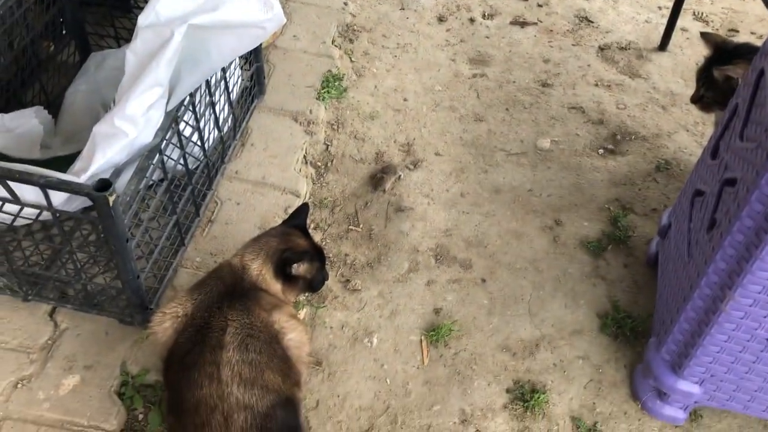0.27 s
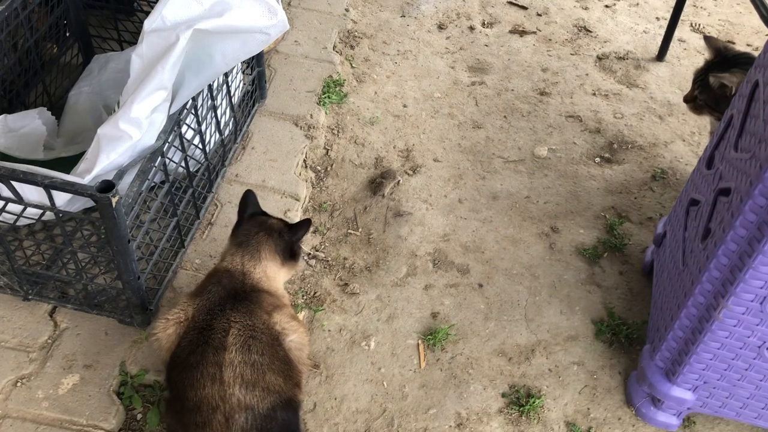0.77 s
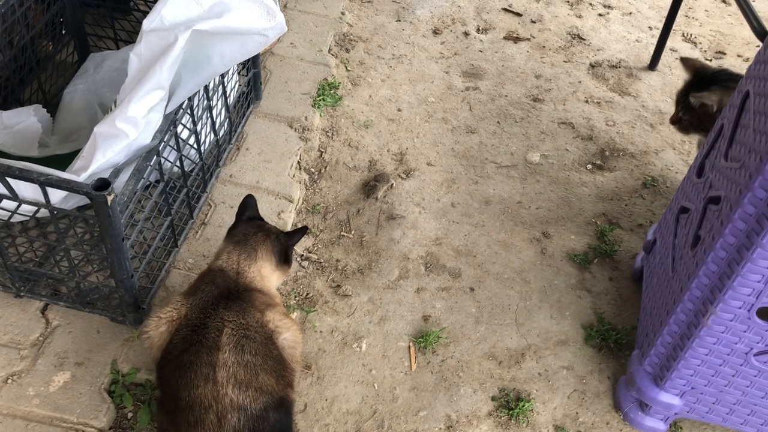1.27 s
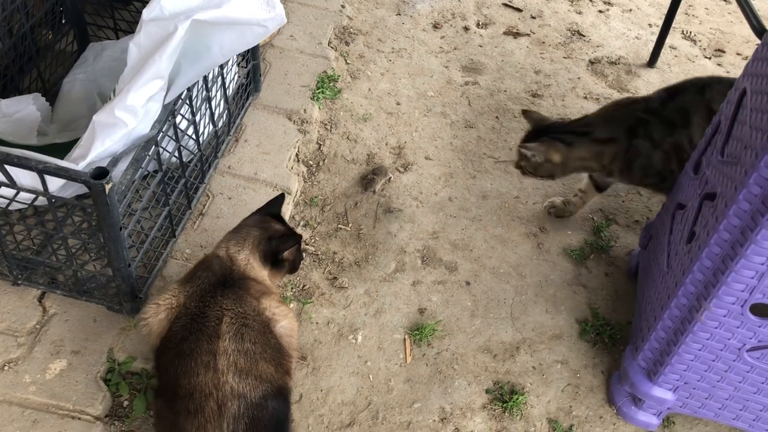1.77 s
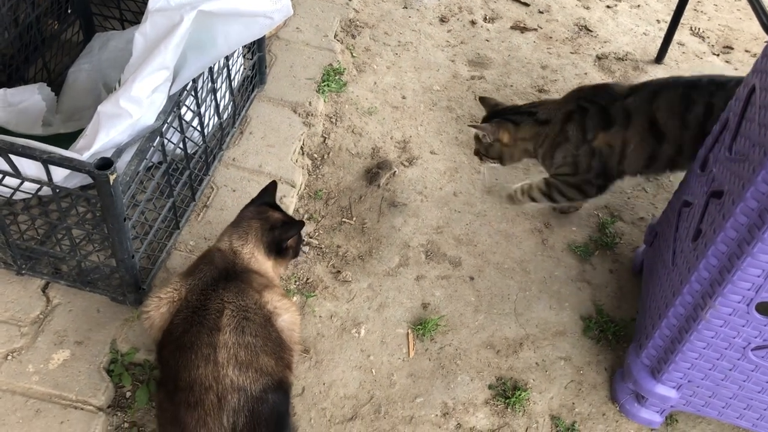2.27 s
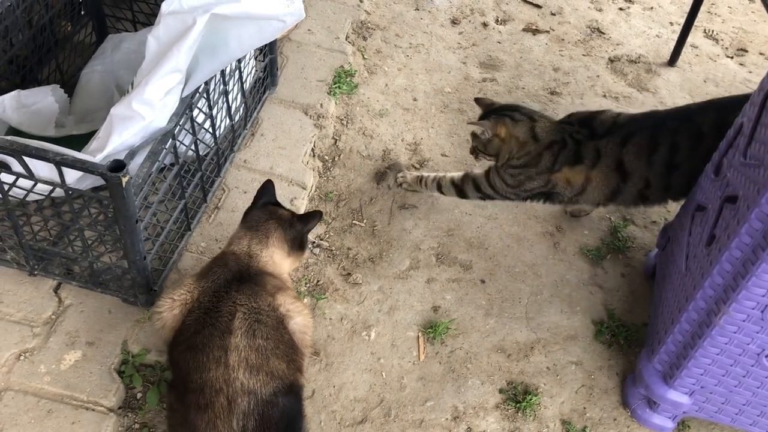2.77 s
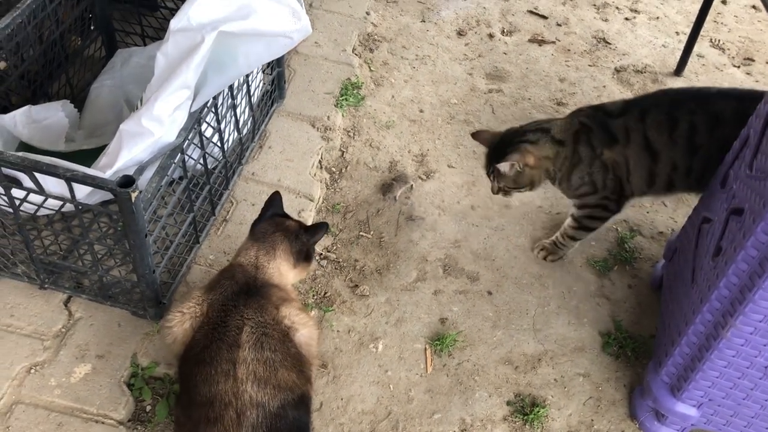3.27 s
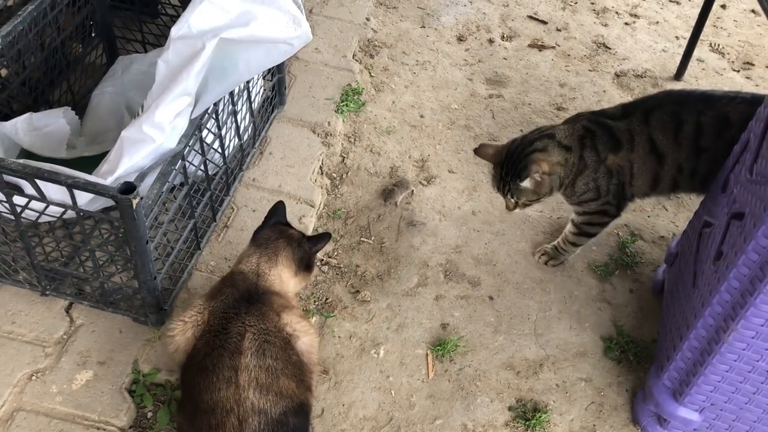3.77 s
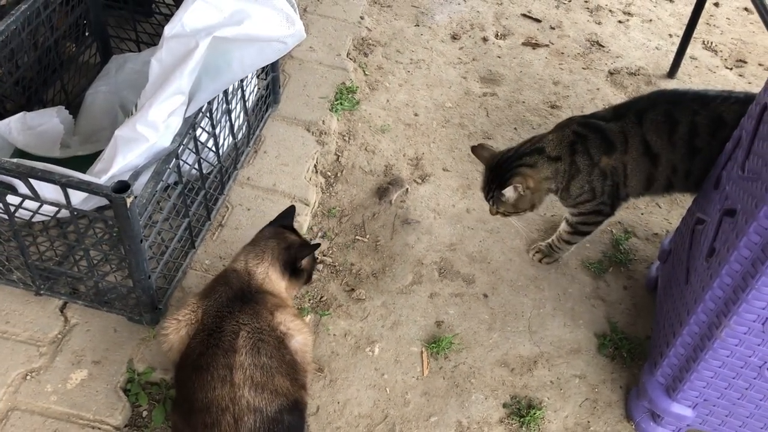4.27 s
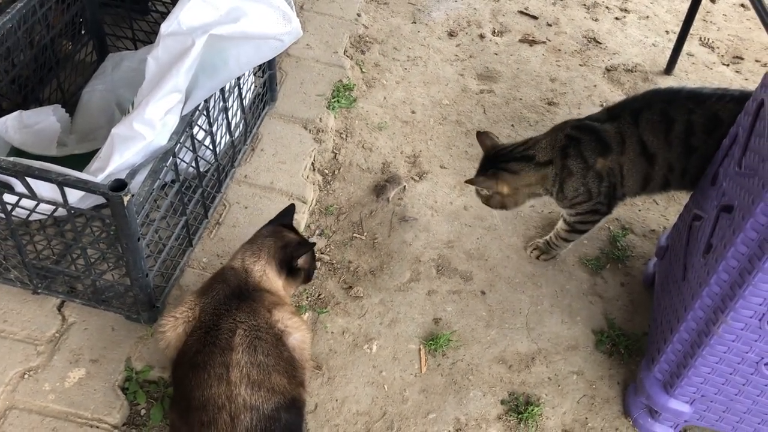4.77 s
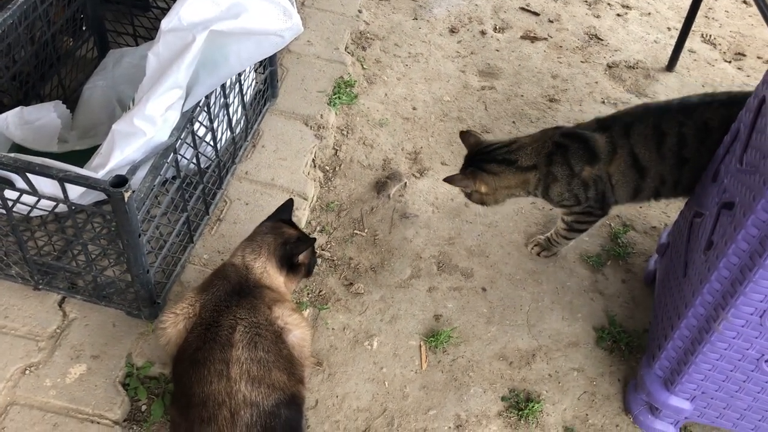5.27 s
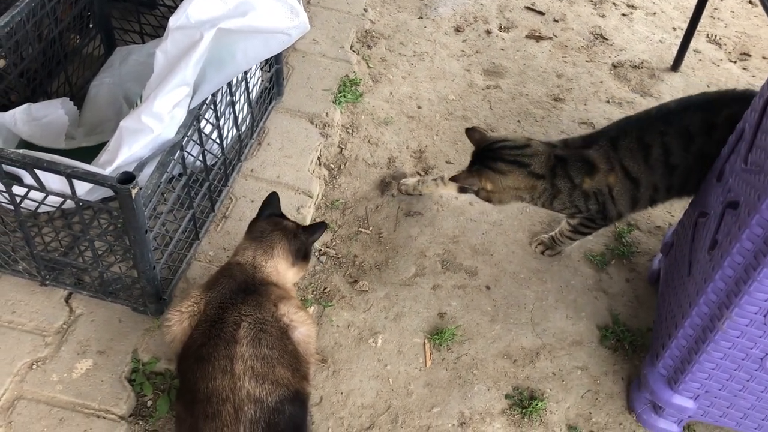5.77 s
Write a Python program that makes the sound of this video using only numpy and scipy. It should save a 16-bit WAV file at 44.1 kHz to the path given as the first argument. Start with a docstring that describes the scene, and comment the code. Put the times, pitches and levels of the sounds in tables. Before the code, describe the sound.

A finger slides over a hand-held phone for about a second, a close, gritty rub with one sharp click and a few dull taps. After that the grip shifts softly now and then. Out in a quiet yard, small distant birds chirp in raspy falling notes while others answer with short peeps, and a nearer one whistles once near the end. Faint outdoor rumble and hiss lie underneath.

```python
"""A finger slides over a hand-held phone, close up: slipping skin rings the case, with grit on top and
a low drag beneath. The case clicks once and takes a few dull taps; later the grip shifts now and then.
Out in the quiet yard, small birds chirp in raspy falling notes, others answer, and a nearer one
whistles once, all scattered by walls. A faint bed of outdoor rumble and hiss lies under it all."""
import sys
import numpy as np
from scipy import signal
from scipy.fft import rfft, irfft
from scipy.io import wavfile
from scipy.ndimage import uniform_filter1d

SR = 44100
rng = np.random.default_rng(int(sys.argv[2]) if len(sys.argv) > 2 else 0)


def store_pcm(level_fs):
    """Save levels as 16-bit WAV."""
    pcm = np.round(np.clip(level_fs, -1, 1) * 32767).astype(np.int16)
    wavfile.write(sys.argv[1], SR, np.atleast_2d(pcm).T)


N = 265129
T = np.arange(N) / SR

# finger pressure through two slides, back to back: t/s, level/dB
SLIDE_PRESSURE = [(0.0, -32), (0.022, -39), (0.192, -39.5), (0.198, -37), (0.288, -43), (0.32, -39),
                  (0.336, -43), (0.402, -34.5), (0.408, -34.5), (0.502, -30.5), (0.584, -34.5),
                  (0.622, -43), (0.886, -52.5), (0.93, -39), (1.084, -51), (1.13, -73)]
# body tone of the case under the finger: f/Hz, level/dB
CASE_EQ = [(190, -43.5), (330, -11.5), (424, -7), (444, -7), (643, 1), (789, -1), (913, -3.5), (1080, -3),
           (1250, -9.5), (1310, -20.5), (1600, -30.5), (2080, -34.5), (3520, -120)]
# rasp of the skin's ridges: f/Hz, level/dB
GRIT_EQ = [(760, -29), (1300, -3), (1880, -5), (1950, -5), (2610, -7), (3000, -10), (3410, -18),
           (3880, -18.5), (4640, -31), (14000, -51)]
# low end of the dragging finger: f/Hz, level/dB
DRAG_EQ = [(45, -16), (70, -3.5), (110, -2.5), (160, -2), (235, -0.5), (320, -5), (420, -17)]
# small shifts of the grip: t/s, length/s, level/dB
GRIP_SHIFTS = [(1.169, 0.13, -57), (1.435, 0.089, -63), (1.553, 0.18, -65), (1.882, 0.079, -57.5),
               (2.196, 0.074, -69.5), (2.424, 0.082, -69), (3.095, 0.12, -63.5), (3.207, 0.082, -61.5),
               (3.405, 0.12, -69), (3.76, 0.099, -67.5), (4.038, .11, -65), (4.183, 0.069, -64)]
# tone of the open air, before rumble and hiss are balanced: f/Hz, level/dB
AIR_EQ = [(28, -20), (50, 1.5), (62, -3), (78, 6), (100, -2.5), (135, -4.5), (200, -7), (350, -11),
          (580, -11.5), (850, -16.5), (1300, -18.5), (2100, -22.5), (2900, -22.5), (4300, -25),
          (6000, -28.5), (15500, -34.5)]
# fingertip taps on the case: t/s, level/dB
FINGER_TAPS = [(.4935, -22), (.514, -23), (.822, -40.5), (.913, -34), (1.198, -48.5), (1.9, -52),
               (1.938, -55), (3.777, -50.5), (3.814, -59)]
# low modes rung by a tap: f/Hz, level/dB, t60/s
TAP_RING = [(627, -1, .025), (814, -2, 0.0227), (1010, -19, 0.021)]
# ticks of the case, so close that they fuse into one click: t/s, level/dB, tilt/(dB per octave)
CASE_TICKS = [(0.4943, -21, -5.5), (0.4958, -20, 3), (.498, -23, 14.5)]
# high modes rung by a tick: f/Hz, level/dB, t60/s
TICK_RING = [(3100, -23, 0.00255), (4245, 0, 0.0065), (4300, 5, 0.0077), (5525, -8, 0.0073),
             (6540, -1, 0.0054), (6600, -30, .1), (7280, -25, 0.00484), (8970, -11.5, 0.0044),
             (10640, -17.5, 0.0036), (15500, -36, 0.00359)]
# one bird's repeated falling call: t/s, length/s, starting f/Hz, level/dB, rasp/(0-1)
FALLING_CALLS = [(0.625, .085, 4440, -67.5, 0.4), (1.28, .13, 4300, -71, .55), (2.089, .1, 4490, -68, 0.66),
                 (2.813, .13, 4200, -67.5, 0.52), (3.61, .075, 3700, -69.7, .5),
                 (3.749, 0.051, 4190, -69, .9), (4.201, 0.18, 4570, -70, 1.),
                 (4.97, .075, 4180, -69.5, 0.98), (5.642, .14, 4280, -67.5, 0.98),
                 (5.744, 0.069, 4325, -66, 1.)]
# other birds' nearly level notes: t/s, length/s, f/Hz, level/dB, rasp/(0-1)
PEEP_NOTES = [(1.43, 0.39, 1966, -77.5, .35), (1.565, .045, 4380, -75, 1.), (3.308, 0.028, 3040, -77, .25),
              (4.88, .028, 3520, -77, 0.45), (4.949, .035, 4400, -65.5, 1.), (5.078, 0.039, 3410, -72, .25),
              (5.135, .04, 2950, -73.5, .8), (5.225, .03, 2870, -76, .1), (5.543, 0.047, 3750, -72.5, .6),
              (5.621, .045, 2600, -74.5, .45), (5.921, 0.034, 2570, -74.5, .3)]
# soft bumps of the hand: peak t/s, level/dB
HAND_BUMPS = [(1.99, -66), (2.26, -66), (2.67, -66), (2.94, -64), (3.11, -66.5), (3.44, -63.5)]
# contour of the nearer bird's whistle: t/s, f/Hz, level/dB
WHISTLE_CONTOUR = [(4.737, 4380, -74), (4.746, 5870, -68), (4.755, 5870, -66), (4.776, 5330, -62.5),
                   (4.787, 5170, -66)]


def undb(db):
    """Decibels to gain."""
    return 10 ** (np.asarray(db) / 20)


def unit(x):
    """Scale to rms 1."""
    return x / np.sqrt(np.mean(x ** 2) + 1e-18)


def curves(table):
    """Breakpoints to envelopes: each column joined by straight lines in time."""
    times, *columns = np.transpose(table)
    return [np.interp(T, times, column) for column in columns]


def arch(start, length):
    """A half-sine envelope that rises and falls once."""
    return np.sin(np.pi * np.clip((T - start) / length, 0, 1)).clip(0)


def colour(x, eq):
    """Apply an EQ curve that falls steeply beyond both ends, then scale to rms 1."""
    hz, db = np.transpose(eq)
    octave, knots = np.log2(np.arange(N // 2 + 1) * SR / N + 1), np.log2(hz)
    beyond = np.abs(octave - np.clip(octave, knots[0], knots[-1]))
    gain = undb(np.interp(octave, knots, db) - 35 * beyond)
    return unit(irfft(rfft(x) * gain, N))


def band(x, lo_hz, hi_hz):
    """Band-pass."""
    return signal.sosfilt(signal.butter(3, [lo_hz, hi_hz], "band", fs=SR, output="sos"), x)


def walk(rate_hz, size=N):
    """A smooth random modulator, rms near 1."""
    hold = int(SR / rate_hz)
    held = np.repeat(rng.standard_normal(size // hold + 1), hold)
    return unit(uniform_filter1d(uniform_filter1d(held, hold), hold))[:size]


def slips(per_s, spread_db):
    """Skin catching and letting go: dense tiny impulses of uneven size."""
    size = undb(spread_db * np.clip(rng.standard_normal(N), -2, 2))
    return (rng.random(N) < per_s / SR) * size * rng.choice([-1, 1], N)


def finger(land_s=0.0011, lift_s=0.028, grit_db=-11.5, grit_fade_db_per_s=6,
           drag_db=-42, drag_onset_s=0.26, soft_hz=720, firm_db=-38):
    """Slides and grip shifts: slips ring the case, skin ridges add grit, the drag adds low end."""
    level_db, = curves(SLIDE_PRESSURE)
    touch = np.clip(np.minimum(T / land_s, (SLIDE_PRESSURE[-1][0] - T) / lift_s), 0, 1)
    press = undb(level_db) * touch
    grit = press * undb(grit_db - grit_fade_db_per_s * T)  # wears off as the finger slows
    drag = undb(drag_db) * (press / press.max()) ** 0.84  # grows more slowly than the pressure
    drag *= np.sqrt(np.minimum(T / drag_onset_s, 1))
    shift = sum(undb(db) * np.sqrt(arch(start, length)) for start, length, db in GRIP_SHIFTS)
    press += shift
    grit += shift * undb(grit_db)
    drag += shift * undb(-12.5)
    judder = undb(0.73 * walk(rate_hz=130))  # the skin grips unevenly
    ring = colour(slips(per_s=5000, spread_db=1) * judder, CASE_EQ)
    scrape = colour(slips(per_s=12000, spread_db=3) * judder, GRIT_EQ)
    rumble = colour(slips(per_s=1200, spread_db=3.5) * judder, DRAG_EQ)
    # a light touch slips softly and sounds darker than a firm one
    dark = unit(signal.sosfiltfilt(signal.butter(2, soft_hz, fs=SR, output="sos"), ring))
    firm = np.clip(press / undb(firm_db), 0.58, 1)
    return press * (firm * ring + (1 - firm) * dark) + grit * scrape + drag * rumble


def air(quiet_s=4.44, crossover_hz=200):
    """Distant rumble under smooth hiss; both step down at quiet_s, and the rumble then wavers a touch."""
    noise = colour(rng.standard_normal(N), AIR_EQ)
    low = signal.sosfiltfilt(signal.butter(3, crossover_hz, fs=SR, output="sos"), noise)
    hiss = (noise - low) / np.std(band(noise, 6000, 15000))  # levelled by its treble
    rumble_db = np.where(T < quiet_s, -69.5, -72 + 0.3 * walk(rate_hz=12))
    treble_db = np.where(T < quiet_s, -79.5, -81.5)
    return unit(low) * undb(rumble_db) + hiss * undb(treble_db)


def strike(modes, tilt_db=0):
    """Modes ringing after one blow, in alternating polarity, tilted per octave about the middle one."""
    t, middle_hz = T[:SR // 5], np.median([hz for hz, _, _ in modes])
    ring = np.zeros(len(t))
    for k, (hz, db, t60) in enumerate(modes):
        decay = undb(db + tilt_db * np.log2(hz / middle_hz) - 60 * t / t60)
        ring += (-1) ** k * decay * np.sin(2 * np.pi * hz * t)
    return ring


def taps_and_click(contact_hz=14000, tail_db=-34, tail_t60=0.14):
    """Soft taps ring the case's low modes; it snaps under the grip with high ones and a faint tail."""
    out, t = np.zeros(N), T[:SR // 5]
    for start, db in FINGER_TAPS:
        i = int(start * SR)
        out[i:i + len(t)] += undb(db) * strike(TAP_RING)
    for start, db, tilt_db in CASE_TICKS:
        tail = unit(band(rng.standard_normal(len(t)), 3996, 9500)) * undb(tail_db - 60 * t / tail_t60)
        i = int(start * SR)
        out[i:i + len(t)] += undb(db) * (strike(TICK_RING, tilt_db) + tail)
    # the contact takes a moment, which rounds the very top
    return signal.sosfilt(signal.butter(3, contact_hz, fs=SR, output="sos"), out)


def bird_note(start, length, from_hz, to_hz, rasp, dwell, rise_db,
              rasp_hz=340, buzz_hz=170, step_hz=900, perch_hz=3380):
    """A gliding whistle: dwell (0-1) holds it on pitch steps, rasp flutters its pitch and level."""
    n = int(length * SR)
    progress = np.arange(n) / n
    glide = from_hz + (to_hz - from_hz) * progress
    step_phase = 2 * np.pi * (glide - perch_hz) / step_hz
    held = glide - dwell * step_hz * np.sin(step_phase) / (2 * np.pi)
    buzz = np.sin(2 * np.pi * buzz_hz * T[:n] + 2 * np.pi * rng.random())
    flutter = buzz + 0.853 * walk(500, size=n)
    hz = held + rasp * rasp_hz * flutter * (1 - 0.55 * np.cos(step_phase))  # steadiest on each step
    hz += (held - hz) * progress ** 3 / 2  # the flutter narrows as the note ends
    rough_db = rasp * 2.5 * walk(86, size=n)
    accent_db = dwell * 0.6 * np.cos(step_phase)
    swell = np.sqrt(np.sin(np.pi * progress)) * undb(rough_db + accent_db + rise_db * (progress - .5))
    tone = swell * np.sin(2 * np.pi * np.cumsum(hz) / SR)
    return np.pad(tone, (int(start * SR), N))[:N]


def chirps(end_hz=2440):
    """One bird repeats a stepped sweep that swells as it falls, always to the same pitch."""
    return sum(undb(db) * bird_note(start, length, hz, end_hz, rasp, dwell=0.83, rise_db=4.5)
               for start, length, hz, db, rasp in FALLING_CALLS)


def twitter(count=52, level_db=-79, spread_db=3):
    """Birds much further off: a sprinkle of tiny gliding pips."""
    out, t = np.zeros(N), T[:int(.025 * SR)]
    for when, pitch, glide, size in rng.random((count, 4)):
        hz = (2400 + 1900 * pitch ** 2) * (1 + 0.266 * (glide - .6) * t / t[-1])
        pip = np.hanning(len(t)) * np.sin(2 * np.pi * np.cumsum(hz) / SR)
        i = int(np.sqrt(when) * (N - len(t)))  # they grow busier
        out[i:i + len(t)] += undb(level_db + spread_db * size) * pip
    return out


def peeps(sag=0.0502):
    """Other birds answer with even notes that sag by a small share of their pitch."""
    high, low = 1 + sag / 2, 1 - sag / 2
    return sum(undb(db) * bird_note(start, length, hz * high, hz * low, rasp, dwell=0, rise_db=-1)
               for start, length, hz, db, rasp in PEEP_NOTES)


def bumps(length_s=.12, lo_hz=60, hi_hz=130):
    """The hand nudges the phone: short swells of bass."""
    swell = sum(undb(db) * arch(peak - length_s / 2, length_s) for peak, db in HAND_BUMPS)
    return swell * unit(band(rng.standard_normal(N), lo_hz, hi_hz))


def whistle():
    """A nearer bird: a quick flick up, then a pure falling tone."""
    hz, db = curves(WHISTLE_CONTOUR)
    gate = (T > WHISTLE_CONTOUR[0][0]) & (T < WHISTLE_CONTOUR[-1][0])
    envelope = uniform_filter1d(gate * undb(db), size=90)
    return envelope * np.sin(2 * np.pi * np.cumsum(hz) / SR)


def yard(x, wet_db, t60=0.19, predelay_s=.004):
    """Scattered echoes off walls and ground follow the direct sound."""
    t = T[:SR // 2]
    echoes = rng.standard_normal(len(t)) * undb(-60 * t / t60) * (t > predelay_s)
    return x + undb(wet_db) * signal.fftconvolve(x, echoes / np.linalg.norm(echoes))[:N]


def scene():
    """Dry handling up front; behind it the birds, wetter with distance, and the bed of air."""
    far_birds = yard(chirps() + peeps() + twitter(), wet_db=-1)
    near_bird = yard(whistle(), wet_db=-6)
    handling = finger() + bumps() + taps_and_click()
    return (handling + far_birds + near_bird + air())[None]


def record(dry, low_cut_hz=38, high_cut_hz=15750):
    """The phone cuts the deepest bass and the top."""
    thin = signal.sosfilt(signal.butter(3, low_cut_hz, "high", fs=SR, output="sos"), dry)
    return signal.sosfilt(signal.ellip(10, .1, 70, high_cut_hz, fs=SR, output="sos"), thin)


dry = scene()
out = record(dry)
store_pcm(out)
```